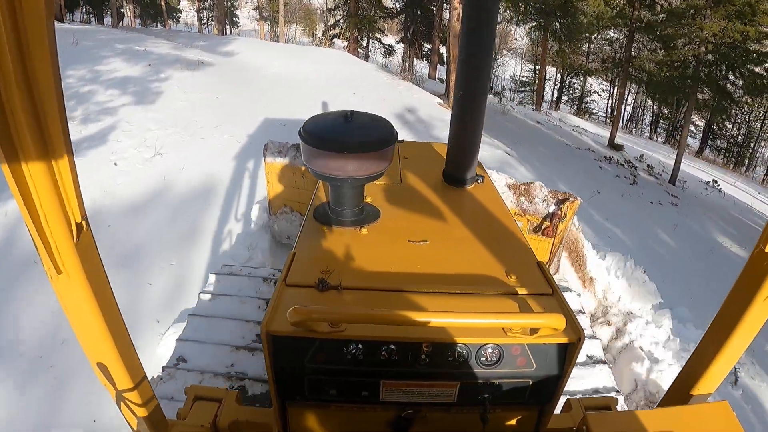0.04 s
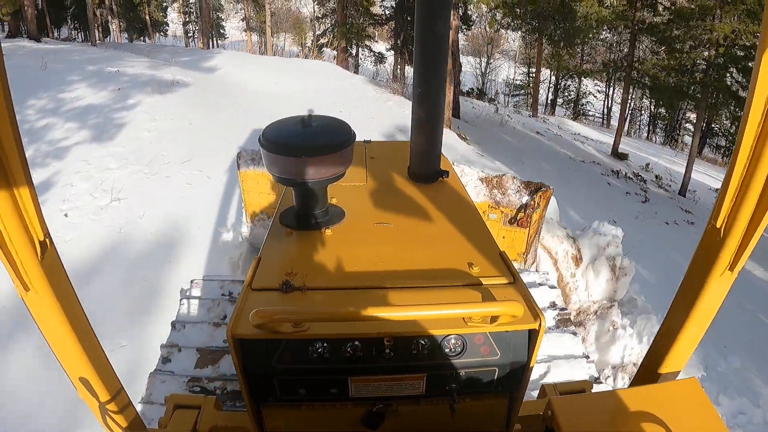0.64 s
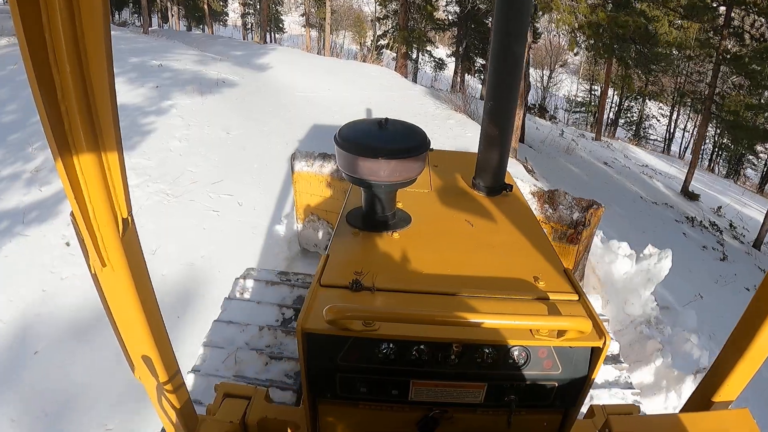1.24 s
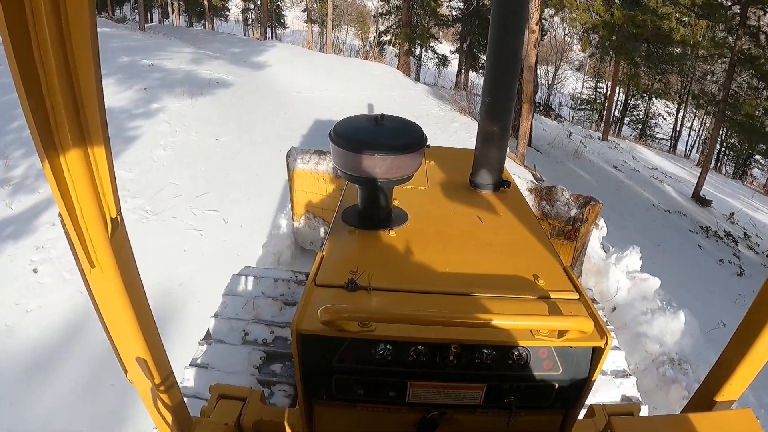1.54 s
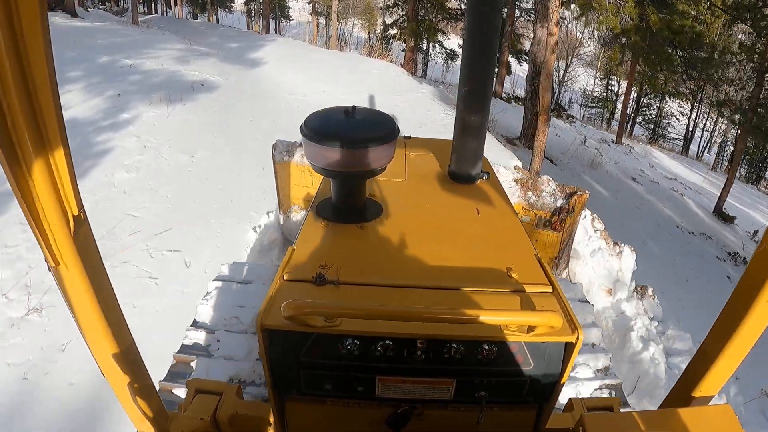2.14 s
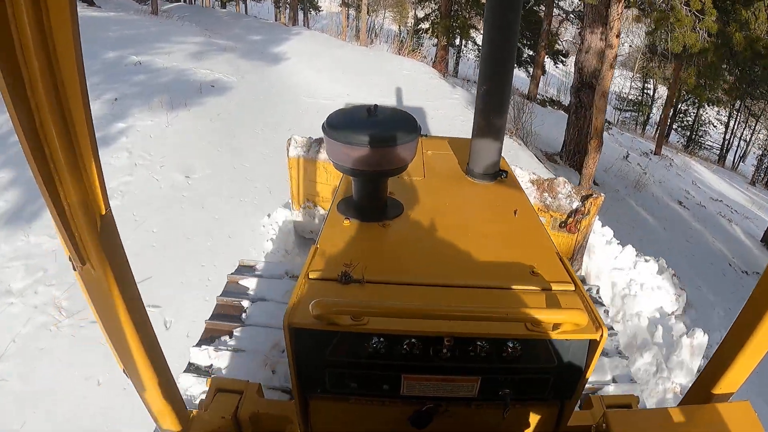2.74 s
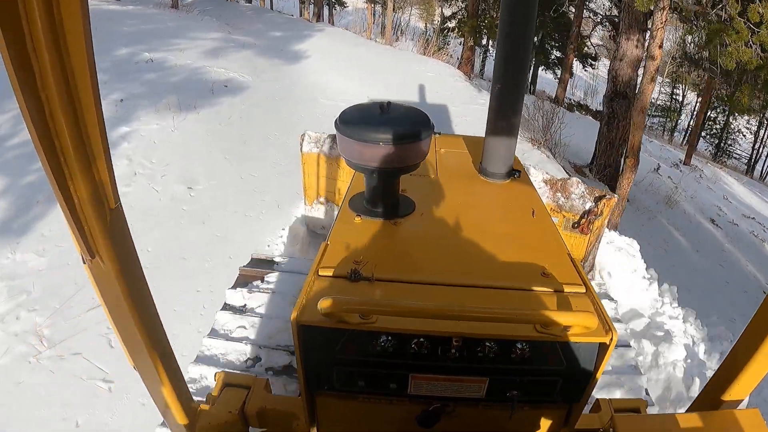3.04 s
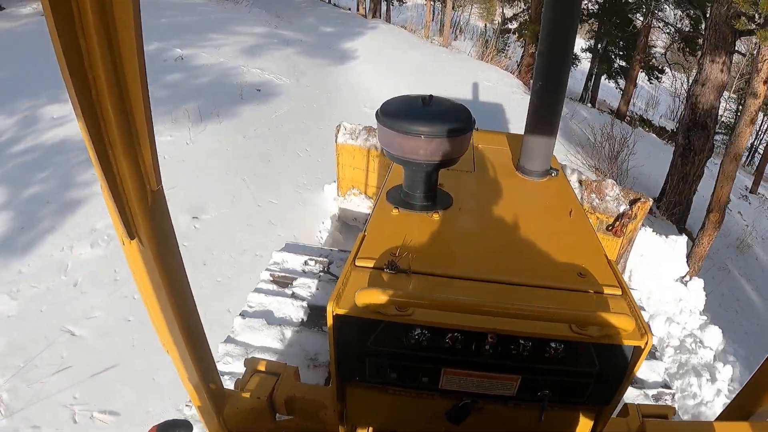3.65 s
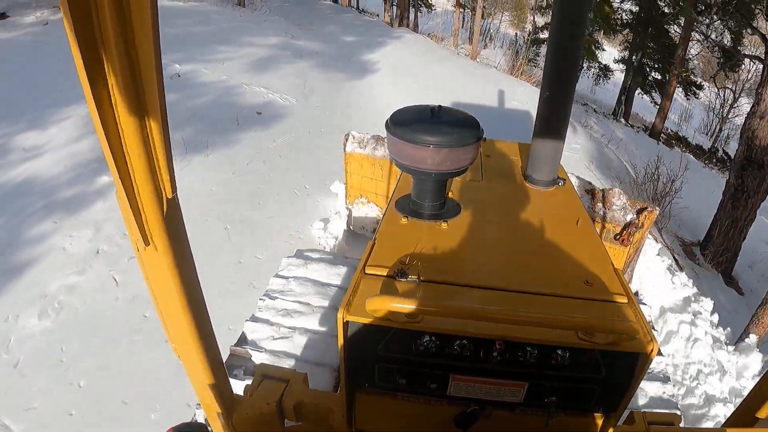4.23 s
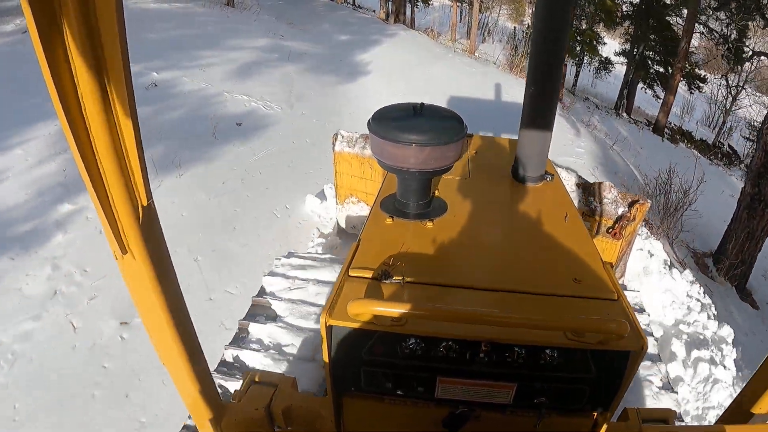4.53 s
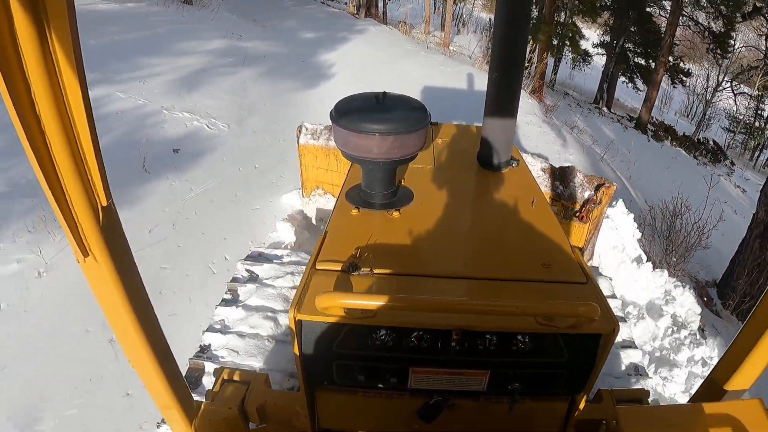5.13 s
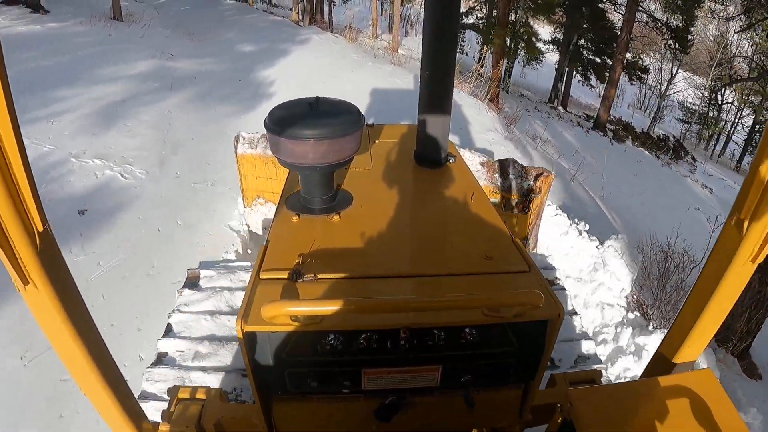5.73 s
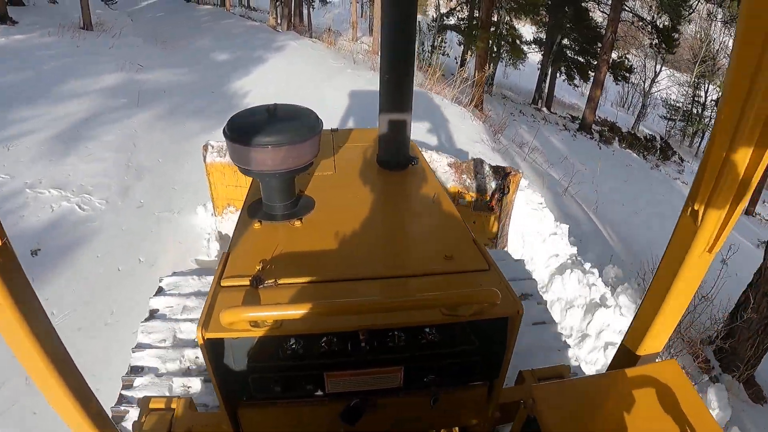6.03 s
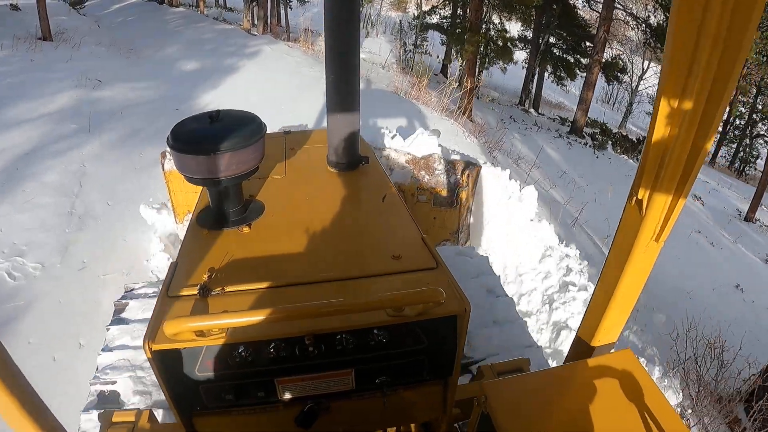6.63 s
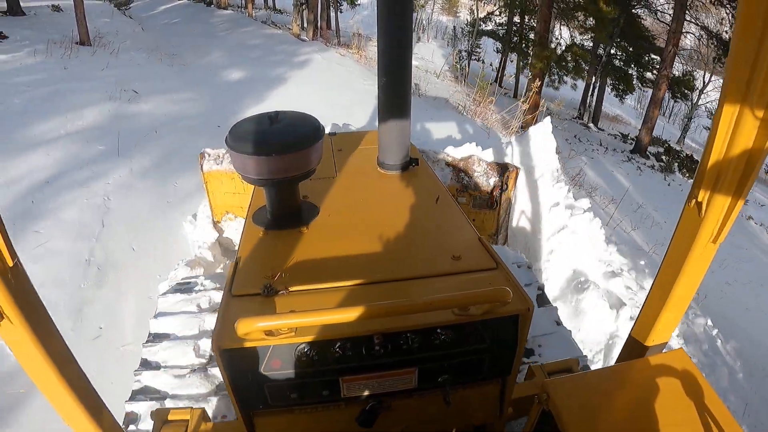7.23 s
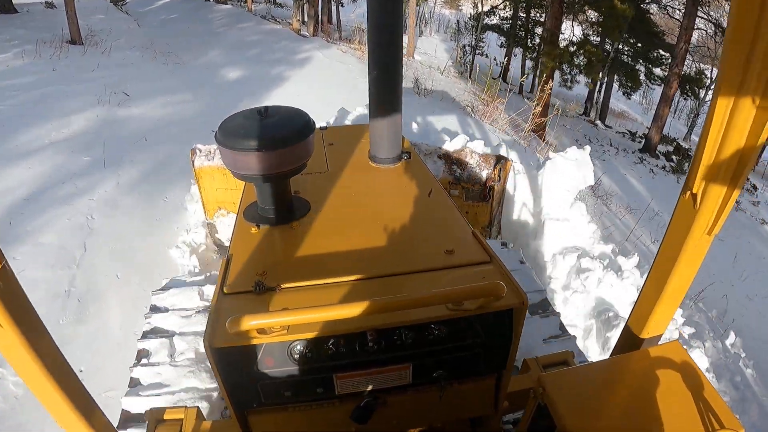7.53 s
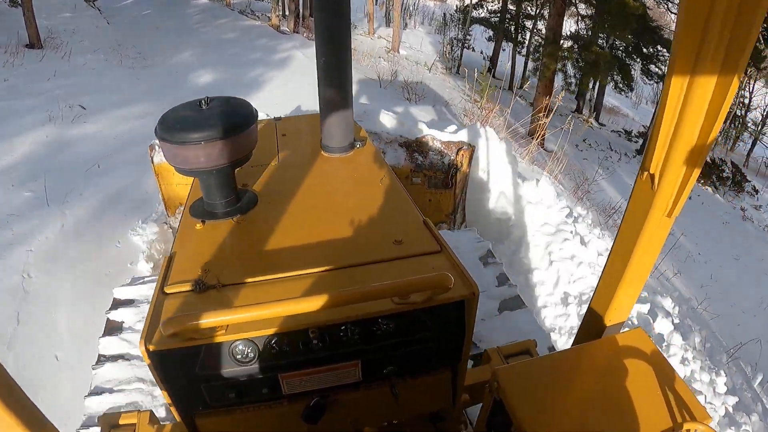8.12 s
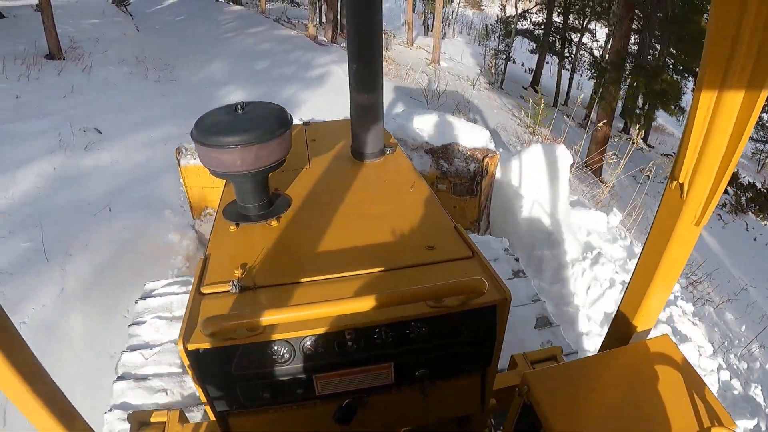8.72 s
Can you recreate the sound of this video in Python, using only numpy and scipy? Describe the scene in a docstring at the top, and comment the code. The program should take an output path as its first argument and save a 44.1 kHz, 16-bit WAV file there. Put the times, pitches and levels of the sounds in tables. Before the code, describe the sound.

A small crawler dozer is heard close from its seat for about nine seconds, crawling over snow. The diesel engine holds a deep, steady drone with barely any change of speed, joined by light rapid knocking, a faint fan hiss and a low hull rumble. Throughout, two steel tracks each lay seven or eight shoes a second, drifting in and out of step in a short, dull clanking with irregular harder hits, rattling links and a hollow grind. Dry pins give brief high chirps around 0.5 to 1 second, again from 2.3 to 3.2, and once near 7. A loose metal part pings lightly five times between 2.2 and 3.8 seconds. A tiny squeak comes at 6.3, and a faint thin steel squeal swells and fades around 7.7. The grinding eases and the clanks turn duller after 8 seconds, while the engine keeps running.

```python
"""A snowy forest track, heard from the seat of a small crawler dozer pushing snow.
Its six-cylinder diesel drones through the stack at governed speed, knocks under the hood and drives
a hissing fan, over the rumble of the hull. Each steel track lays seven or eight clanking shoes a second,
one a little faster than the other. Links grind, rattle and slap, dry pins chirp, a loose part pings
and steel squeals thinly on the idlers."""
import sys
import numpy as np
from scipy import signal
from scipy.fft import rfft, irfft, next_fast_len
from scipy.io import wavfile
from scipy.ndimage import map_coordinates

SR = 44100
rng = np.random.default_rng(int(sys.argv[2]) if len(sys.argv) > 2 else 0)


def to_wav(sig):
    """Store sig (one row per channel, or 1-D mono) as 16-bit WAV at the path in sys.argv[1].

    Samples outside -1..1 are clipped; the rate is SR.
    """
    pcm = np.clip(np.atleast_2d(sig), -1, 1) * 32767
    pcm = np.round(pcm).astype(np.int16)
    wavfile.write(sys.argv[1], SR, pcm.T)  # frames by channels


N = 391166


def amp(db):
    """Decibels to gain."""
    return 10 ** (np.asarray(db) / 20)


def unit(x):
    """Scale to rms 1."""
    return x / np.sqrt(np.mean(x ** 2) + 1e-20)


def along(points, hz):
    """Read (frequency, value) points on a log axis."""
    freqs, values = np.transpose(points)
    return np.interp(np.log(hz + 1), np.log(freqs + 1), values)


def automation(points):
    """Draw (time, value) points as one value per sample."""
    return np.interp(np.arange(N) / SR, *np.transpose(points))


def wobble(rate):
    """A smooth random curve, rate knots a second."""
    return map_coordinates(rng.standard_normal(N // 20), [np.arange(N) * rate / SR], order=3)


def filtered(x, response):
    """EQ x with a gain given as a function of frequency."""
    size = next_fast_len(N + SR // 2)
    return irfft(rfft(x, size) * response(np.fft.rfftfreq(size, 1 / SR)), size)[..., :N]


def add(out, s, sound):
    """Mix a sound into out at time s."""
    part = out[..., max(round(s * SR), 0):][..., :sound.shape[-1]]
    part += sound[..., :part.shape[-1]]


# Stereo image, near mono in the bass and wider above: (frequency [Hz], left-right correlation [0-1])
STEREO_IMAGE = [(100, .999), (250, 0.99), (620, 0.9), (800, 0.74), (1100, 0.89), (2000, 0.72), (3200, 0.36),
                (4400, 0.74), (5600, 0.89), (8500, 0.57)]

def spread(pair, spectrum):
    """Two unrelated signals become one coloured stereo sound of rms 1."""
    def mid_side_eq(hz):
        angle = np.arccos(along(STEREO_IMAGE, hz)) / 2
        return amp(along(spectrum, hz)) * np.array([np.cos(angle), np.sin(angle)])
    mid, side = filtered(pair, mid_side_eq)
    return unit(np.array([mid + side, mid - side]))


# Weaker engine tones: (multiple of the cycle rate [x], relative level [dB], lift when racing [dB])
ENGINE_ORDERS = [(3.04, -26.5, 0), (9, -22.5, -1), (10.81, -24, 0), (12, -32, 0), (21.4, -30, 0),
                 (36, -26, 1), (49.7, -35.5, 0), (54, -32, -3), (60, -31.5, 3.5), (62.6, -32, -1),
                 (72, -37, -4), (84, -37, 3.5), (90, -36.5, 3), (96, -38, 3.5)]
CYLINDERS, GOVERNED_HZ, SWING_HZ = 6, 101, .6

def drone(cycle, firing_hz, firing_db=-1.5, firing_waver_db=.2, waver_db=1.8):
    """The stack's firing tone; weaker tones swell or fade as speed moves them across panel resonances."""
    racing = np.tanh((firing_hz - GOVERNED_HZ) / SWING_HZ)
    tone = lambda multiple: np.sin(2 * np.pi * (multiple * cycle + rng.random()))
    weak = sum(amp(db + lift_db * racing + waver_db * wobble(4)) * tone(multiple)
               for multiple, db, lift_db in ENGINE_ORDERS)
    firing = amp(firing_db + firing_waver_db * wobble(11)) * tone(CYLINDERS)
    return unit(firing + weak)


# Combustion and injector blows: (position in the cycle [0-1], accent [dB])
ENGINE_BLOWS = [(.03, 3), (.17, 0.6), (.32, -0.5), (.39, -0.5), (.51, 2), (.67, 1.5), (.82, 1), (.9, -2.5)]
# Ringing hood panels: (frequency [Hz], width [Hz], boost [dB])
HOOD_PEAKS = [(842.7, 19, 8), (914, 27, 2.5), (2949, 48, 9)]
# Mid-heavy colour of the engine block: (frequency [Hz], relative level [dB])
BLOCK_EQ = [(150, -15), (250, -7), (450, -2), (620, 0.5), (760, -9), (860, -2.5), (1050, 1), (1280, -1.5),
            (1450, -4.5), (2000, -11), (2800, -17.5), (3400, -32), (7000, -35), (13000, -83)]

def knock(cycle, block_t60_s=.093, hood_t60_s=.11, hood_gain=.6, repeat=.26, scatter_db=1, jitter_s=5e-5):
    """Each blow strikes block and hood with its own ring; part repeats, part is new every time."""
    t = np.arange(SR // 14) / SR
    decay = amp(-60 * t / block_t60_s) + hood_gain * amp(-60 * t / hood_t60_s)
    out = np.zeros((2, N))
    for position, db in ENGINE_BLOWS:
        signature = rng.standard_normal((2, len(t)))
        for s in np.interp(np.arange(position, cycle[-1], 1), cycle, np.arange(N) / SR):
            ring = np.sqrt(repeat) * signature + np.sqrt(1 - repeat) * rng.standard_normal((2, len(t)))
            add(out, s + jitter_s * rng.normal(), amp(db + scatter_db * rng.normal()) * decay * ring)
    panels = lambda f: amp(sum(db / (1 + (2 * (f - hz) / width) ** 2) for hz, width, db in HOOD_PEAKS))
    return spread(filtered(out, panels), BLOCK_EQ)


# Bright, airy colour of the fan: (frequency [Hz], relative level [dB])
FAN_EQ = [(800, -28), (2000, -2), (3300, 1), (4500, 0), (6400, -4), (7300, -7), (8400, -14.5), (10000, -17),
          (11000, -23), (12200, -21), (13200, -35.5), (14600, -42)]
# Fader ride on the fan: (time [s], level [dB])
FAN_LEVEL = [(0, -39), (0.7, -38), (1.7, -40), (2.6, -38.5), (3.6, -40.5), (6.7, -39), (7.5, -39.5),
             (8.87, -38.5)]

def fan_hiss(cycle, beat_db=.27, tick_db=.1, drift_db=.5, flutter_db=1.05, grain_db=.84):
    """Fan air and valve ticking, pulsing slightly with the engine cycle."""
    beat = np.cos(2 * np.pi * cycle)
    ticks = np.cos(2 * np.pi * len(ENGINE_BLOWS) * cycle)
    swirl_db = drift_db * wobble(17) + flutter_db * wobble(45) + grain_db * wobble(250)
    air = spread(rng.standard_normal((2, N)), FAN_EQ)
    return amp(automation(FAN_LEVEL) + beat_db * beat + tick_db * ticks + swirl_db) * air


# Low-end weight of the hull: (frequency [Hz], relative level [dB])
HULL_EQ = [(15, -20), (30, -7), (43, -8), (53, -8), (62, 2.5), (75, 4.5), (92, -3.5), (130, 3.5),
           (175, -1.5), (230, -7), (380, -7), (560, -10), (760, -17), (4000, -106)]

def hull_rumble(level_db=-23.5, shake_db=1.6):
    """The hull and the cab panels shake as the machine crawls."""
    return amp(level_db + shake_db * wobble(12)) * spread(rng.standard_normal((2, N)), HULL_EQ)


# Hollow colour of links on rollers: (frequency [Hz], relative level [dB])
GRIND_EQ = [(400, -60), (900, -18), (1170, -1), (1290, 0), (1750, -26), (5000, -100)]
# Fader ride on the grinding: (time [s], level [dB])
GRIND_RIDE = [(0, -38), (1.2, -35), (2, -36.5), (5.2, -35.5), (6.4, -35.5), (7.2, -35), (8.1, -37),
              (8.4, -46)]

def link_grind(rough_db=2.0):
    """Links scrub over the rollers in a rough, narrow band."""
    level_db = automation(GRIND_RIDE) + rough_db * wobble(60)
    return amp(level_db) * spread(rng.standard_normal((2, N)), GRIND_EQ)


# Modes of the track frame: (frequency [Hz], relative level [dB], 60 dB decay time [s])
FRAME_MODES = [(348, -11, 0.035), (443, -8.5, 0.04), (560, -1.5, 0.046), (626, -2, 0.044),
               (1040, -1.5, 0.03), (1260, 0, 0.03), (1750, -8, 0.02)]

def clank(thud_db, edge_db, crossover_hz=800, detune=.05, scatter_db=2, attack_s=.0024, width_rad=.2):
    """Steel contact rings the snow-damped frame, differently at each spot: a low thud, a bright edge."""
    t = np.arange(SR // 12) / SR
    hz, db, t60 = np.transpose(FRAME_MODES)[:, :, None]
    strength, pitch, phase = rng.standard_normal((3, len(FRAME_MODES), 1))
    stereo_phase = width_rad * rng.standard_normal((2, len(FRAME_MODES), 1))
    envelope = amp(db + scatter_db * strength - 60 * t / t60) * (1 - np.exp(-t / attack_s))
    modes = envelope * np.sin(2 * np.pi * hz * (1 + detune * pitch) * t + phase + stereo_phase)
    bright = hz[:, 0] > crossover_hz
    thud, edge = modes[:, ~bright].sum(axis=1), modes[:, bright].sum(axis=1)
    onset_rms = lambda ring: np.std(ring[:, :len(t) // 12])
    return amp(thud_db) * thud / onset_rms(thud) + amp(edge_db) * edge / onset_rms(edge)


def landings(pace, first_s, thud_db, scatter_db=1.8, jitter_s=.002434):
    """A track lays a shoe each time it moves on by one link: rows of (time [s], thud level [dB])."""
    shoes = np.cumsum(automation(pace)) / SR
    times = np.interp(np.arange(shoes[round(first_s * SR)], shoes[-1]), shoes, np.arange(N) / SR)
    return [(s + jitter_s * rng.normal(), thud_db + scatter_db * rng.normal()) for s in times]


# Tempo of the faster track: (time [s], pace [shoes/s])
FAST_PACE = [(0, 7.82), (2, 7.89), (4.8, 7.92), (5.4, 8.15), (6.1, 7.82), (7, 7.95), (8.87, 7.78)]
# Tempo of the slower track: (time [s], pace [shoes/s])
SLOW_PACE = [(0, 7.37), (2, 7.16), (2.8, 6.97), (3.9, 6.95), (4.7, 7.51), (5.8, 7.3), (7.2, 7.09),
             (8.87, 7.33)]
# Accents, shoes that slam down hard: (time [s], thud level [dB])
SHOE_SLAMS = [(0.034, -19.5), (0.08, -20), (0.201, -20), (0.338, -17.5), (0.707, -19.5), (1.14, -19.5),
              (1.224, -19.5), (1.268, -20.5), (1.404, -20.5), (1.489, -19.5), (1.545, -20.5),
              (1.607, -20.5), (1.683, -21.5), (1.73, -19), (1.986, -18.5), (2.119, -19.5), (2.238, -19),
              (2.381, -19.5), (2.669, -19.5), (2.813, -18.5), (2.998, -18.5), (3.093, -20), (3.238, -20),
              (3.384, -18), (3.524, -19.5), (3.817, -19.5), (3.887, -19), (3.958, -19.5), (4.096, -16.5),
              (4.137, -20.5), (4.245, -19), (4.641, -18.5), (4.785, -19.5), (4.924, -19), (5.026, -17.5),
              (5.147, -18.5), (5.184, -19), (5.321, -19.5), (5.39, -20), (5.457, -18.5), (5.639, -20.5),
              (5.726, -19.5), (5.762, -17.5), (6.167, -20.5), (6.273, -16), (6.397, -19), (6.532, -18.5),
              (6.557, -18.5), (6.648, -17.5), (6.785, -18.5), (6.905, -18.5), (7.155, -18.5),
              (7.286, -17.5), (7.411, -20.5), (7.536, -16), (7.667, -20), (7.82, -19), (8.045, -17.5),
              (8.109, -19), (8.177, -19.5), (8.299, -20), (8.434, -19.5), (8.684, -19.5), (8.811, -20)]

def tracks(bounce_db=-12, rattles=330, rattle_db=-30, edge_db=-11, slam_span_s=.03):
    """Two tracks drift in and out of step; their shoes land and bounce, and slack links rattle."""
    out = np.zeros((2, N))
    fast = landings(FAST_PACE, first_s=.079, thud_db=-22.5)
    slow = landings(SLOW_PACE, first_s=.034, thud_db=-27)
    # a slam takes the place of any regular landing close to it
    soft = [(s, db) for s, db in fast + slow if all(abs(s - at) > slam_span_s for at, _ in SHOE_SLAMS)]
    grind_db = automation(GRIND_RIDE)
    brightness_db = edge_db + grind_db - grind_db.mean()  # harder grinding, brighter clanks
    for s, thud_db in soft + SHOE_SLAMS:
        shoe_edge_db = thud_db + brightness_db[min(round(s * SR), N - 1)]
        add(out, s, clank(thud_db, shoe_edge_db))
        add(out, s + rng.uniform(.00617, .025), amp(bounce_db) * clank(thud_db, shoe_edge_db))
    for s in rng.uniform(0, N / SR, size=rattles):
        add(out, s, amp(rattle_db + rng.normal()) * clank(0, edge_db))
    return out


# Dry track pin cues: (time [s], pitch [ratio], squeak level [dB], scrape level [dB])
PIN_CUES = [(.252, 1, -67, -49), (.398, 1, -62, -50), (.548, 1.01, -42, -48), (.695, .995, -34, -44),
            (.827, .985, -36, -64), (1.023, 1.04, -45, -52), (2.316, 1.01, -60, -55),
            (2.387, .88, -60, -54), (2.453, 1.02, -50, -55), (2.595, .98, -62, -45),
            (2.617, 1.01, -39.5, -60), (2.726, 1.01, -56, -50), (2.737, .87, -60, -49),
            (2.863, 1.01, -50, -57), (3.158, 1.02, -41, -66), (5.645, 1.02, -62, -58),
            (6.931, 1.02, -42, -68)]
# Thin top of a pin's chirp: (frequency [Hz], relative level [dB])
PIN_PARTIALS = [(10600, 0), (11150, -7), (13250, -11)]
# Colour of a pin's rasp: (frequency [Hz], relative level [dB])
RASP_EQ = [(5000, -18), (9400, 0), (12500, -8), (14200, -21.5)]

def pin_chirps(squeak_hz=5900, squeak_waver=.035, top_waver=.012, rasp_db=-5,
               attack_s=.011, release_s=.016):
    """A dry pin slips in its bush: a short wavering squeak and a scrape of thin overtones and rasp."""
    t = np.arange(-SR // 32, SR // 12) / SR
    swell = np.exp(np.where(t < 0, -(t / attack_s) ** 2, -t / release_s))
    slip = wobble(1200)
    rasp = spread(rng.standard_normal((2, N)), RASP_EQ)
    out = np.zeros((2, N))
    for s, pitch, squeak_db, scrape_db in PIN_CUES:
        part = slice(round(s * SR), round(s * SR) + len(t))
        tone = lambda hz, waver: np.sin(2 * np.pi * hz * pitch * np.cumsum(1 + waver * slip[part]) / SR)
        squeak = unit(tone(squeak_hz, squeak_waver))
        overtones = unit(sum(amp(db) * tone(hz, top_waver) for hz, db in PIN_PARTIALS))
        scrape = unit(overtones + amp(rasp_db) * rasp[:, part])
        add(out, s + t[0], swell * (amp(squeak_db) * squeak + amp(scrape_db) * scrape))
    return out


# Slack link cues: (time [s])
SLAP_CUES = [1.225, 1.492, 1.684, 4.925, 5.64, 7.157]

def link_slaps():
    """A slack link slaps a roller: a bright knock with little thud."""
    out = np.zeros((2, N))
    for s in SLAP_CUES:
        add(out, s, clank(thud_db=-34, edge_db=-24))
    return out


# Loose part cues: (time [s])
PING_CUES = [2.193, 2.966, 3.081, 3.555, 3.791]

def loose_pings(hz=2950, level_db=-37, t60_s=.13):
    """A thin, loose metal part is jolted now and then and rings on one note."""
    out, t = np.zeros(N), np.arange(SR // 8) / SR
    for s in PING_CUES:
        add(out, s, amp(level_db - 60 * t / t60_s) * np.sin(2 * np.pi * hz * t))
    return out


# Thin steel squeals: (peak time [s], pitch [Hz], peak level [dB], fade each side [s])
SQUEAL_CUES = [(5.6, 11770, -70.5, 1), (5.8, 12280, -68.5, .25), (6.277, 3800, -38, 0.013),
               (7.7, 6400, -52.5, .5)]

def idler_squeals(waver=.0012):
    """A link rubbing on an idler holds one slightly wavering note, swelling and fading."""
    t = np.arange(N) / SR
    wavering_t = np.cumsum(1 + waver * wobble(150)) / SR
    return sum(amp(db) * np.exp(-2 * ((t - s) / fade_s) ** 2) * np.sin(2 * np.pi * hz * wavering_t)
               for s, hz, db, fade_s in SQUEAL_CUES)


# Engine speed, sagging under load, then held by the governor: (time [s], firing rate [Hz])
ENGINE_SPEED = [(0, 100.8), (0.35, 100.8), (0.65, 99.54), (0.9, 99.95), (1.1, 99.29), (1.4, 101.3),
                (1.75, 101.4), (2.25, 100.3), (2.68, 101.8), (2.88, 100.6), (3.15, 101), (4.7, 101.7),
                (7, 101.3), (8.87, 100.6)]

def scene(drone_db=-12.5, knock_db=-25.5):
    """The mix: one crankshaft times every engine sound; the tracks run at their own pace."""
    firing_hz = automation(ENGINE_SPEED)
    cycle = np.cumsum(firing_hz) / SR / CYLINDERS  # four-stroke cycles elapsed
    engine = amp(drone_db) * drone(cycle, firing_hz) + amp(knock_db) * knock(cycle) + fan_hiss(cycle)
    crawl = hull_rumble() + tracks() + link_grind()
    return engine + crawl + link_slaps() + pin_chirps() + loose_pings() + idler_squeals()


# Stereo balance at the seat: (frequency [Hz], left minus right [dB])
BALANCE = [(100, 0), (270, 0.5), (400, 1), (1500, 1.9), (2200, -0.5), (3200, 1.5), (5800, 0), (7500, 2)]
TOP_HZ = 14600

def record(dry):
    """The master: click-free ends, a slight lean to the left and a hard cut of the highest treble."""
    eased = dry * signal.windows.tukey(N, .001)
    return filtered(eased, lambda hz: amp(np.outer([.5, -.5], along(BALANCE, hz))) * (hz < TOP_HZ))


dry = scene()
out = record(dry)
to_wav(out)
```